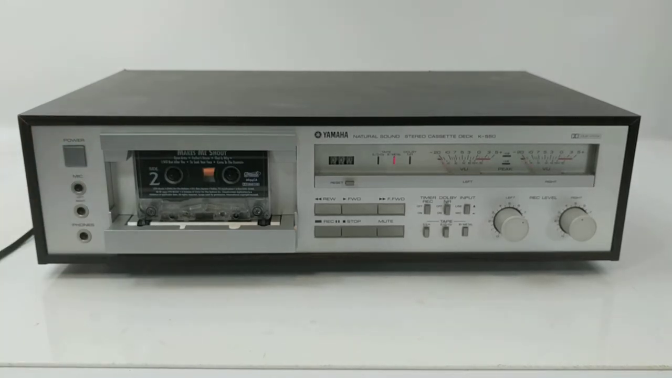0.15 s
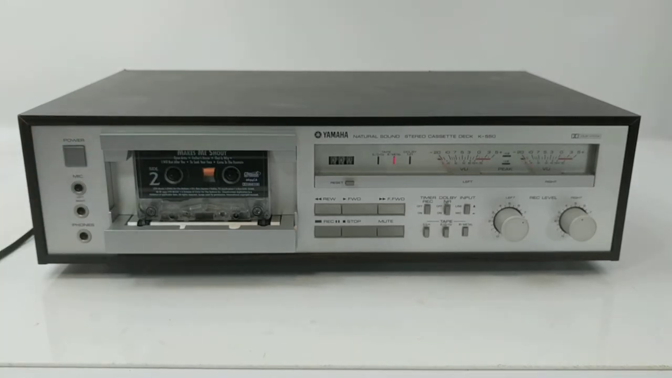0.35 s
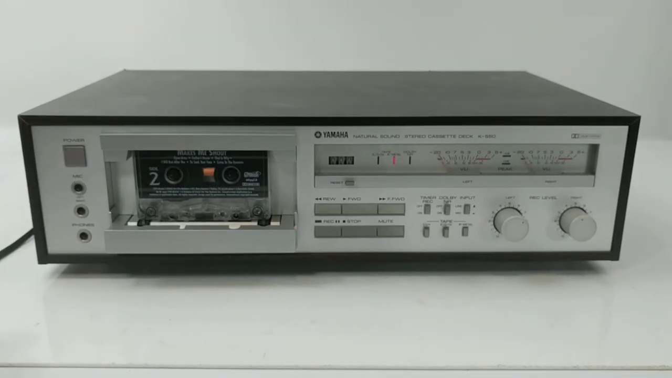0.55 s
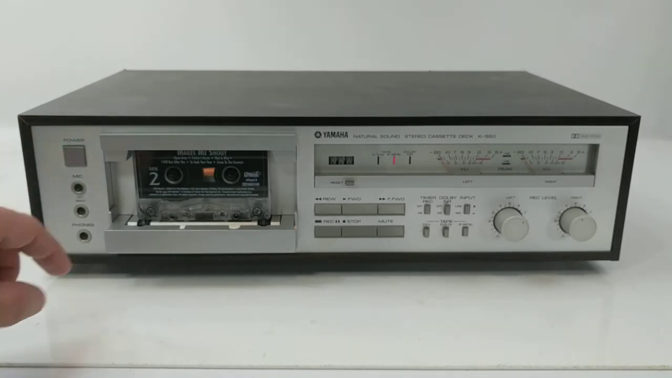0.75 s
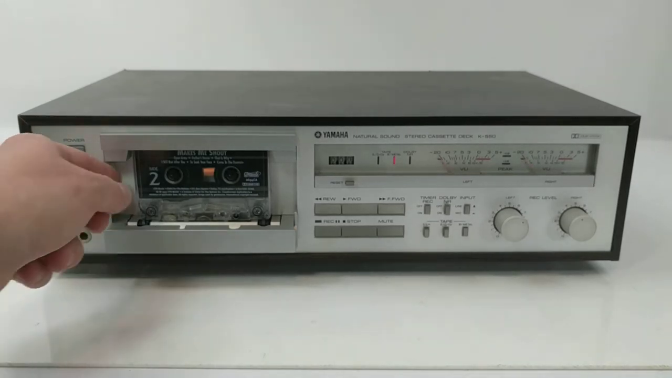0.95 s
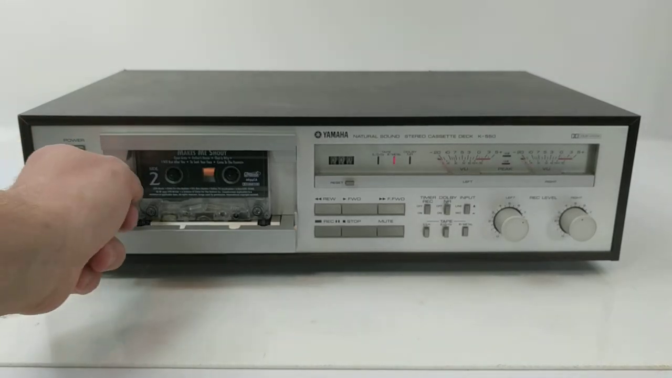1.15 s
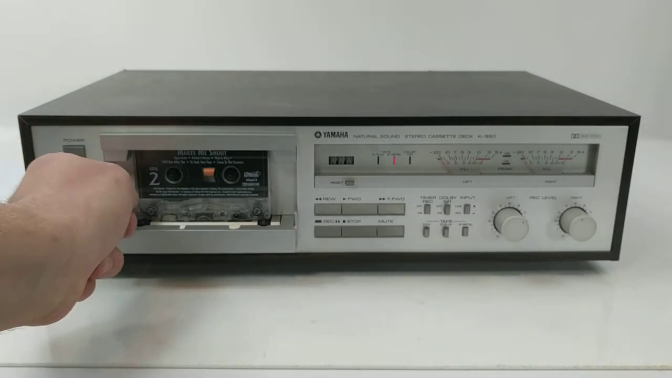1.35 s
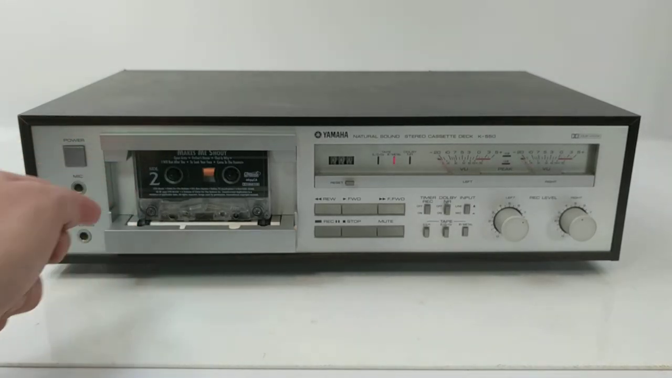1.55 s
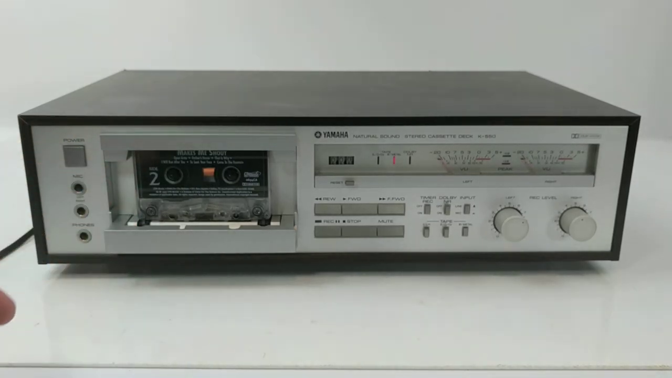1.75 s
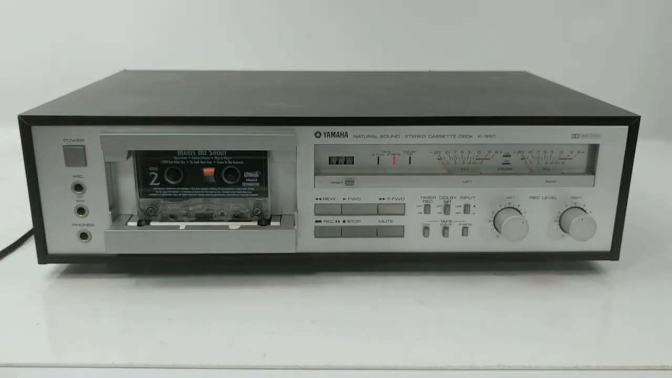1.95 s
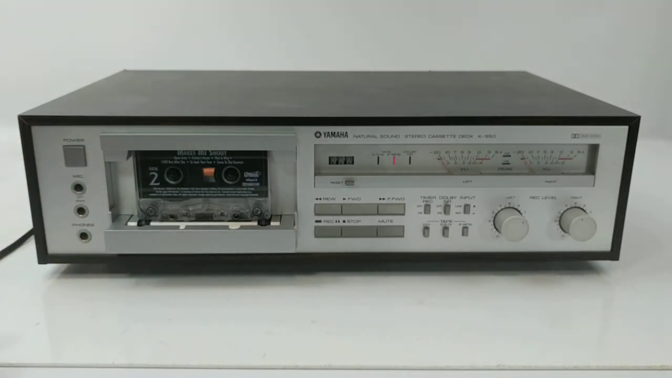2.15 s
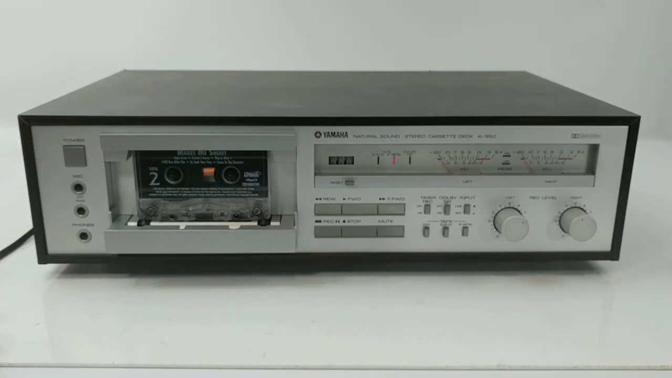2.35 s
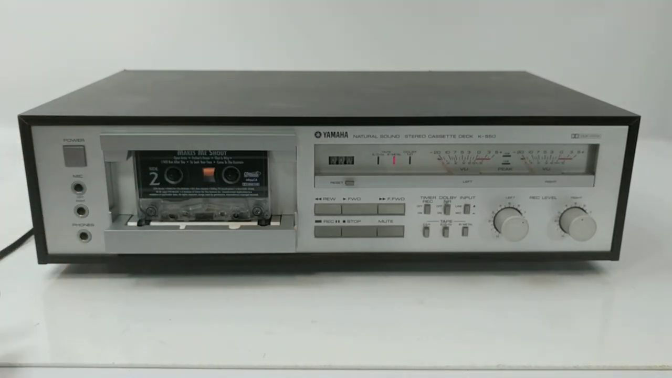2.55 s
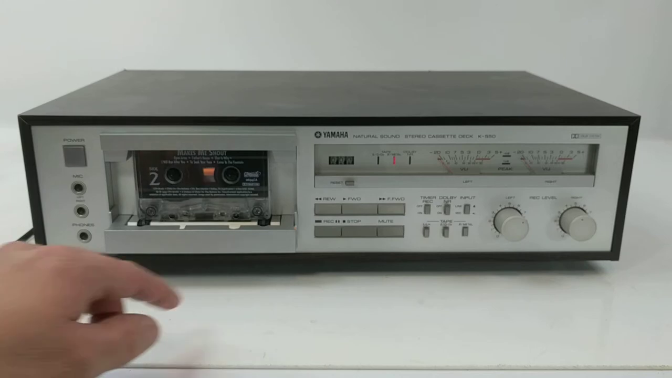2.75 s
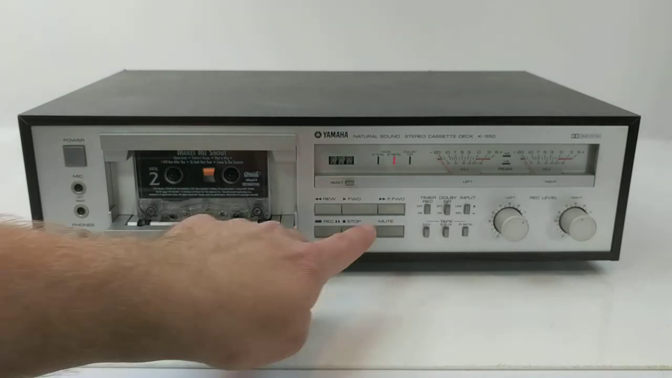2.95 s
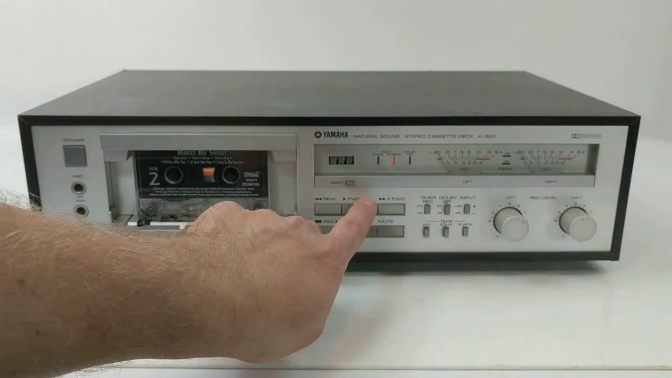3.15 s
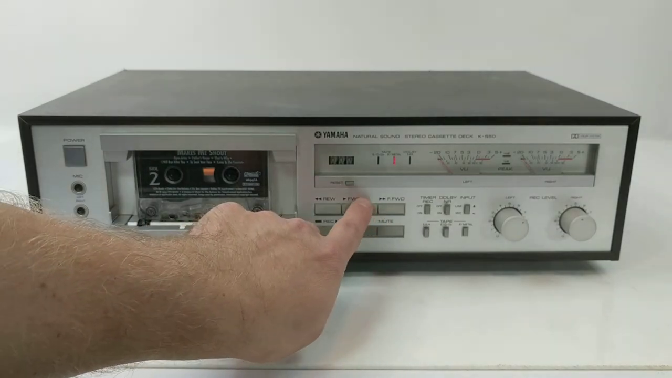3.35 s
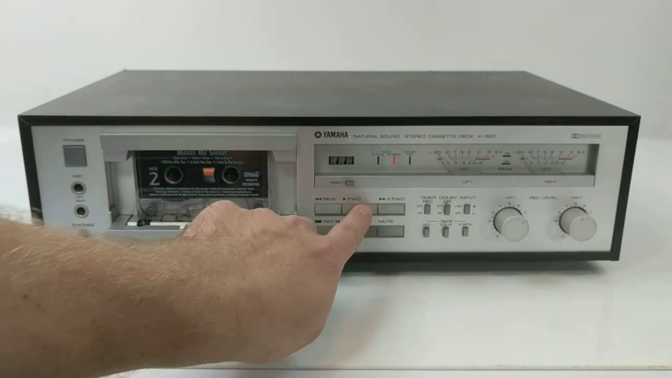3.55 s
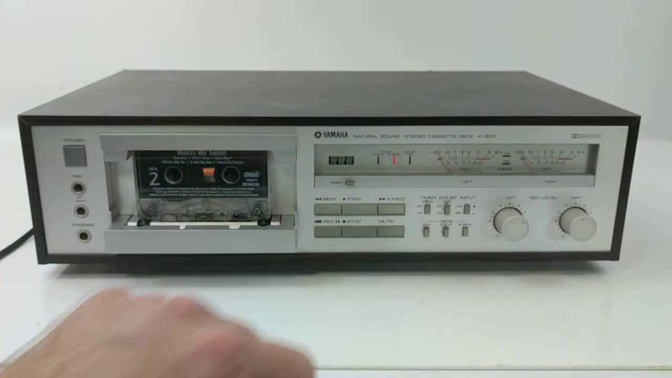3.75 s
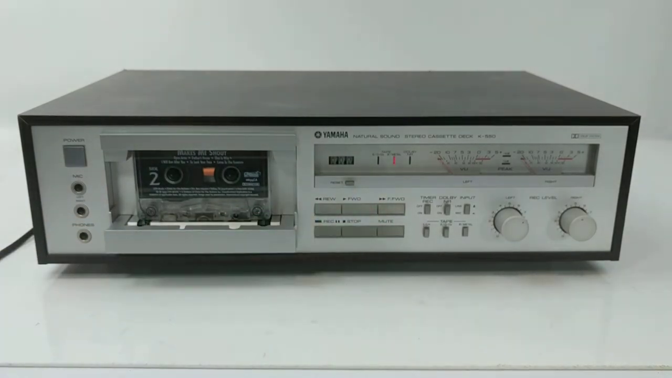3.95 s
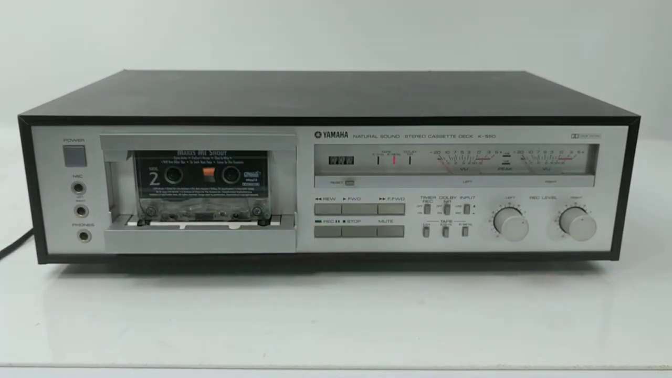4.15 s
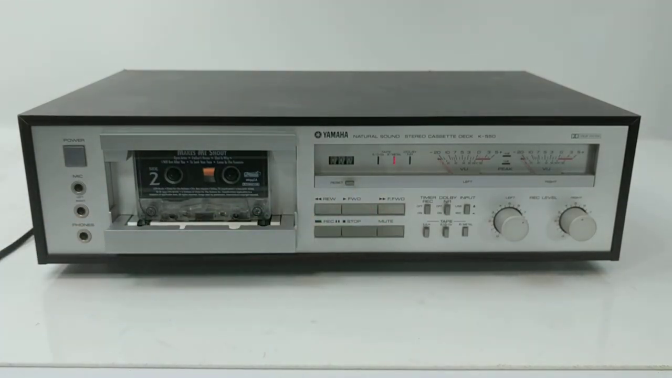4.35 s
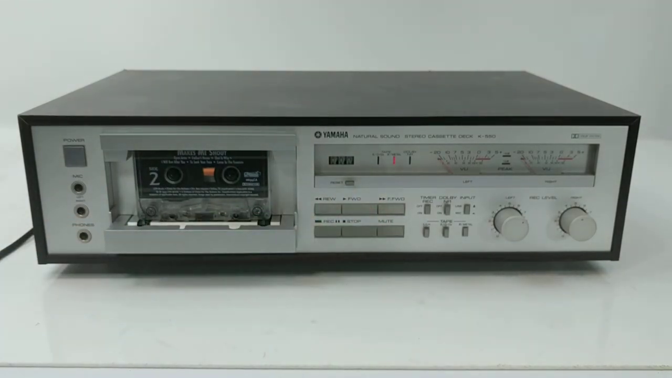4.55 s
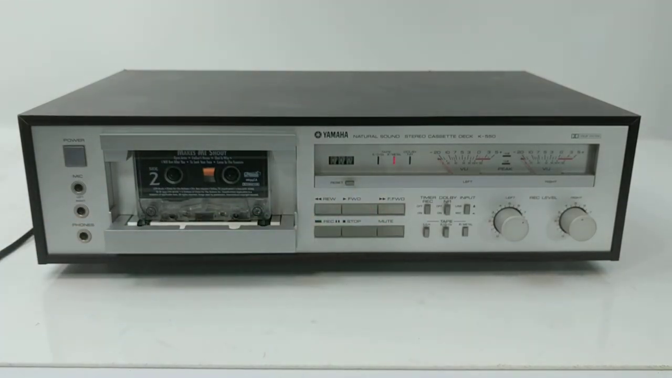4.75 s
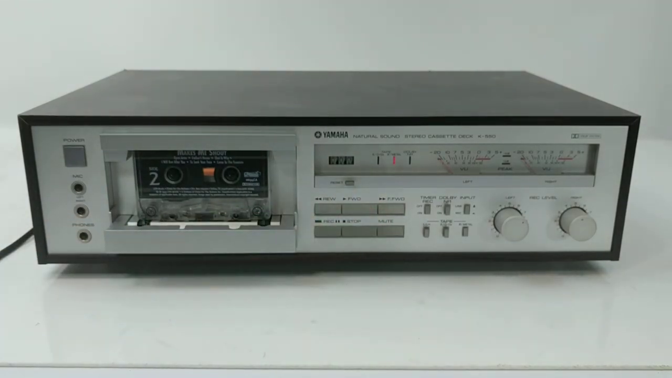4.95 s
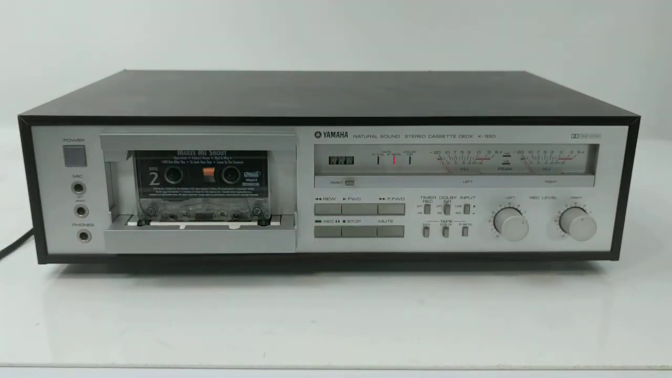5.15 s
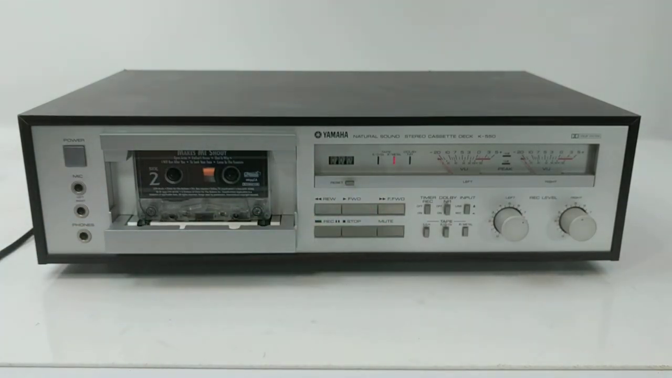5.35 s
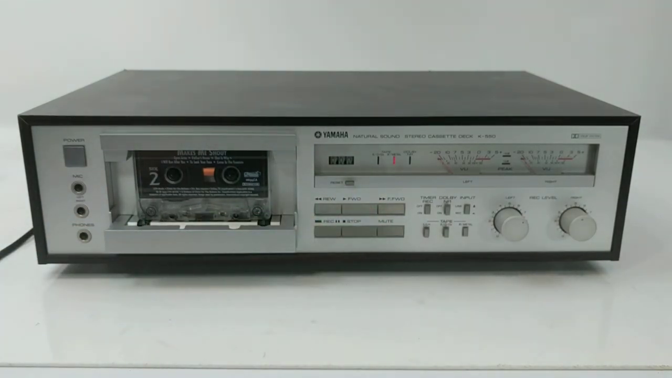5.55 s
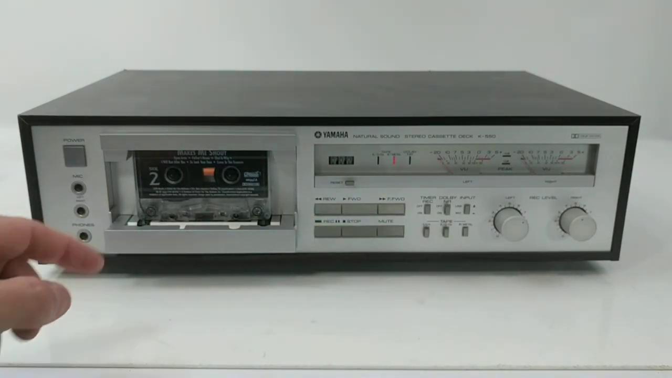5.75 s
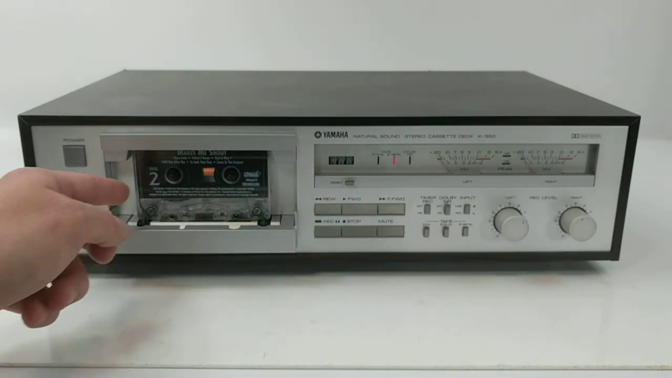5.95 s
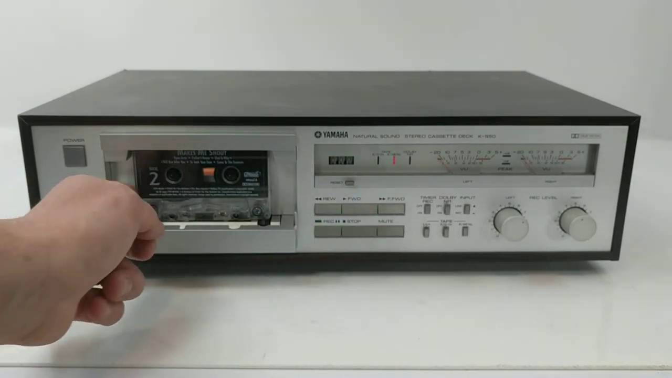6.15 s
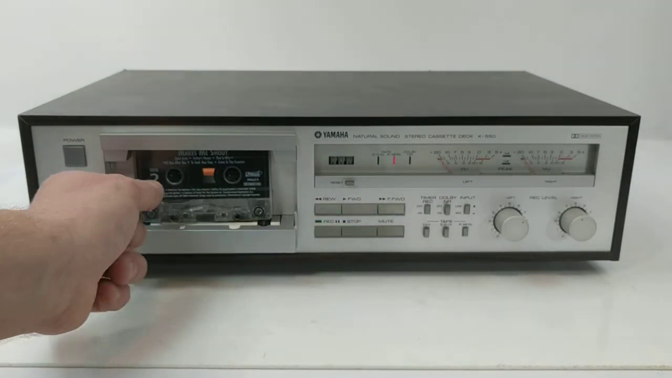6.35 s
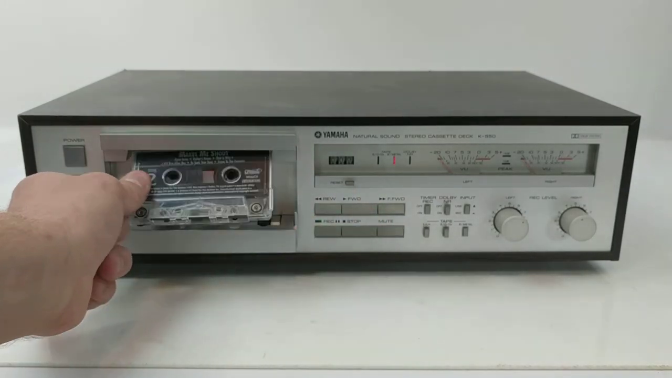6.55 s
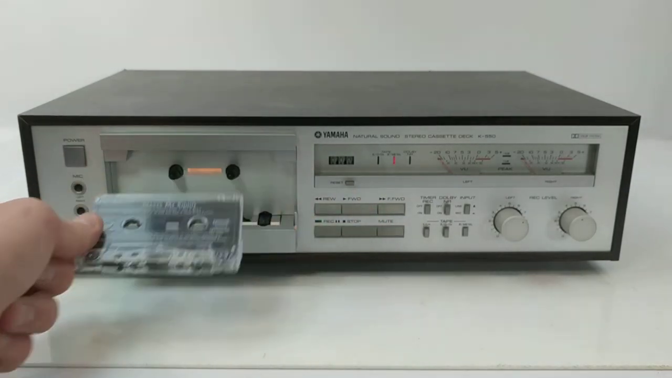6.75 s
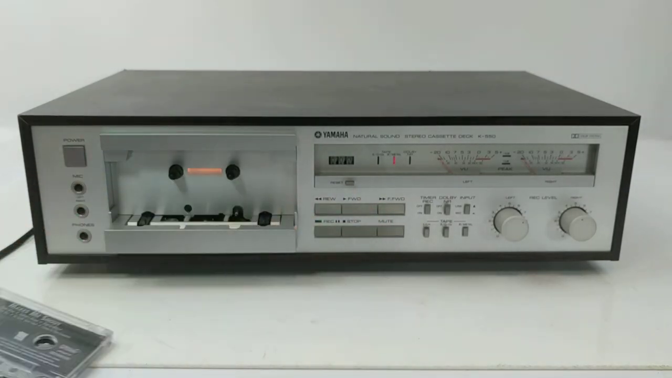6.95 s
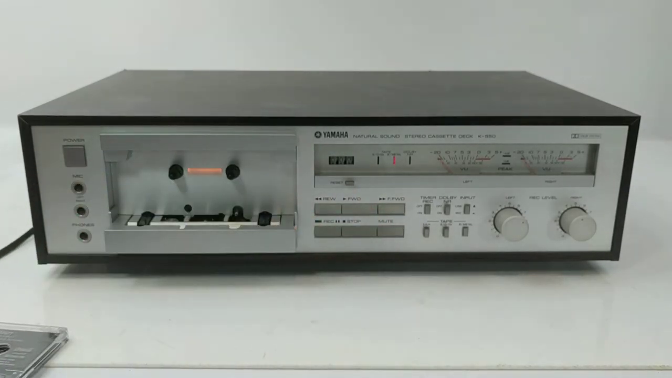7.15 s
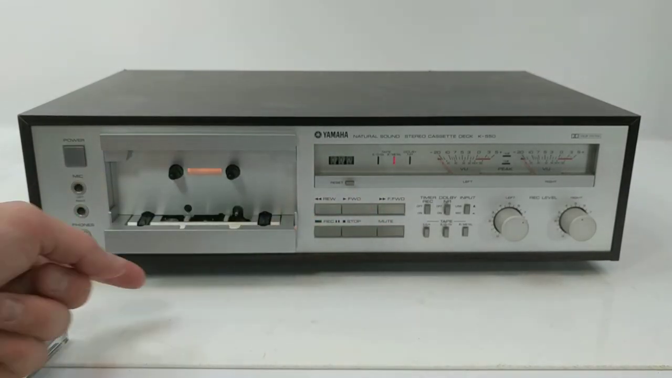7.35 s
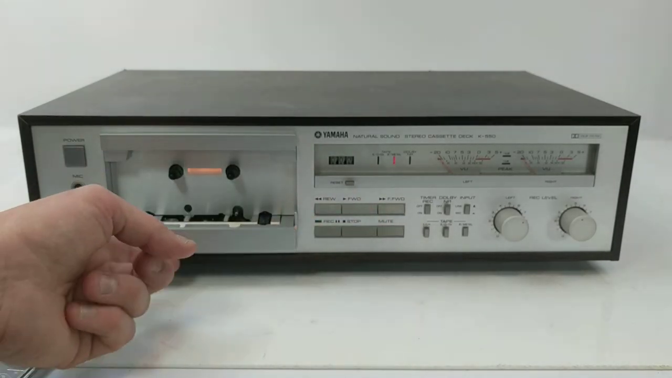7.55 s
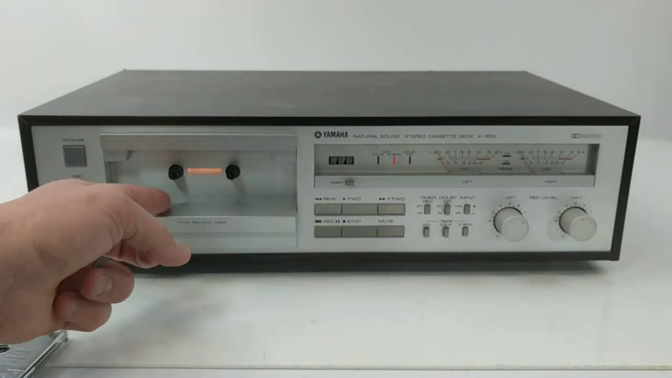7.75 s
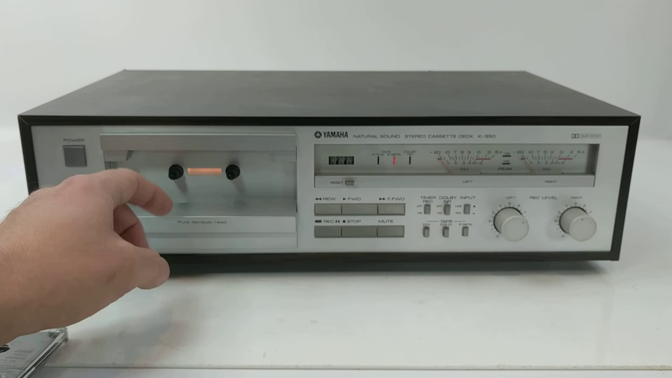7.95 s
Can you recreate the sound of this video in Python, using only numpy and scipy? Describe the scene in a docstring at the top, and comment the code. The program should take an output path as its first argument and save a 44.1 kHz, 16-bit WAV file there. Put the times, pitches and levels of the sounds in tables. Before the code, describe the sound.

Cassette deck hums softly, two pairs of solid mechanical clunks, then silence of the motor, sharp plastic clatter of a tape removed, a soft cover click.

```python
"""Cassette deck in a quiet room

A deck on a hard table, heard close, with the tail of the room some 20 dB lower. Multiples of the turn rate
make its capstan motor hum; twice the solenoid throws the head bridge in, faint gear ticks run, and it drops.
Then the motor stops, the cassette is pulled out of its well and put down on the table, and the head cover
is shut: each blow is a burst of chattering noise that rings the modes of what it strikes."""
import sys
import numpy as np
from scipy import signal
from scipy.fft import rfft, irfft
from scipy.io import wavfile
from scipy.ndimage import uniform_filter1d, map_coordinates

SR = 44100
rng = np.random.default_rng(int(sys.argv[2]) if len(sys.argv) > 2 else 0)


def output_pcm(signal):
    """Save a mono or channel-first signal as 16-bit PCM at the path in sys.argv[1].

    Samples are clipped to [-1, 1] before scaling.
    """
    pcm = np.clip(np.atleast_2d(signal).T, -1, 1) * 32767
    wavfile.write(sys.argv[1], SR, np.round(pcm).astype(np.int16))


N = 351918

# Edges of the five bands: thud, body, knock, clack, tick [Hz].
BAND_EDGES_HZ = [60, 300, 900, 2500, 7000, 19000]
# How long each band chatters on. One number per band: share of the t60 of the blow [ratio].
CHATTER_SHARE = [3.4, 2.03, 0.84, 0.69, 0.59]

# Colour of the room rumble. Each row: frequency in Hz, relative density in dB per Hz.
RUMBLE = [(15, -30.5), (25, -18), (75, -5), (156, -14.5), (364, -13.5), (1010, -23.5), (1160, -23.5),
          (1380, -24.5), (2500, -31.5), (3250, -53.5), (5500, -120)]
# Colour of the steady hiss. Each row: frequency in Hz, relative density in dB per Hz.
HISS = [(1470, -35), (2500, -5.5), (3240, 0.5), (6190, -9.5), (8140, -9), (9010, -13.5), (12000, -5.5),
        (12300, -8.5), (15100, -6), (16200, -20)]
# Thin steady whistles. Each row: frequency in Hz, width in Hz, rms level in dB.
WHISTLES = [(8123, 40, -98), (11630, 60, -88), (15100, 60, -97)]
RUMBLE_DB, HISS_DB = -68.5, -75.5   # rms
HISS_WAVER_DB = 0.7
BACKGROUND_CUTOFF_HZ, TOP_CUTOFF_HZ = 16200, 16900
ROOM_T60_S, ROOM_DB = 0.27, -20   # t60 before each band's share; tail against the direct sound

# Cycles of the transport. Each row: bridge thrown in seconds, dropped in seconds, latch resets in seconds.
CYCLES = [(.884, 1.508, 1.788), (3.499, 4.122, 4.395)]

# Strong lines of the motor hum. Each row: multiple of the turn rate, level in dB over HUM_DB running free,
# the same in dB with the pinch roller pressed on.
HUM_LINES = [(3, -5, -7), (4, -6.5, -8.5), (5, -13, -19), (6, 2.5, 2.5), (9, -4, 0), (10, -1.5, -1.5),
             (11, -6.5, -11), (12, -4, -5), (15, 5.5, 0), (17, -7.5, -16), (18, -15, -19), (20, -2, -1),
             (21, -7.5, -9), (22, -16, -16), (23, -8, -4.5), (25, -14, -15), (26, -20, -12.5),
             (27, -10.5, -11), (28, -5.5, -5), (29, -5.5, -7), (32, -35, -16), (34, -21, -12),
             (39, -16.5, -21), (43, -19, -23), (48, -17.5, -20)]
WEAK_DB, WEAK_DB_PER_MULTIPLE = -19, -0.2926   # all other multiples up to 52
TURN_HZ, FIRST_TURN = 37.44, 0.605   # turn rate; share of a turn done at the start
HUM_DB = -67   # reference for the lines
# Colour of the bearing noise. Each row: frequency in Hz, relative density in dB per Hz.
WHIRR = [(35, -36), (60, -24.5), (223, -5), (504, -6.5), (563, -3.5), (690, -6), (743, -7.5), (1180, -15),
         (5000, -25.5), (6500, -65), (11000, -120)]
WHIRR_DB, LOADED_WHIRR_DB = -73, 4.5   # rms running free; rise under load
PRESS_S, STOP_S, COAST_S = 0.045, 6.32, 0.1   # roller settles; power is cut; the motor dies 60 dB

# Take-up gear: starts after the throw, stops before the drop, time per tooth.
GEAR_LAG_S, GEAR_EARLY_S, TOOTH_S = 0.146, 0.03, 0.0297
GEAR_HZ, GEAR_DB = 10000, -66.5

# Thin pings and squeaks of springs and rubbing plastic.
# Each row: start in seconds, length in seconds, frequency in Hz, rms level in dB.
SQUEAKS = [(.958, 0.0083, 1300, -58), (1.008, 0.0054, 1480, -59.5), (.975, 0.049, 4760, -70),
           (.963, 0.075, 7050, -76), (6.367, .004, 1650, -39.5), (6.481, .004, 8800, -34.5),
           (6.547, 0.0117, 3560, -44), (6.574, 0.0035, 1600, -46), (6.666, .022, 7600, -56),
           (6.948, 0.029, 8700, -66), (7.035, 0.0078, 7600, -56.5), (7.765, .04, 5100, -78.5),
           (7.842, 0.018, 5070, -81)]
# A spring bounces six times after the first throw.
BOUNCE_FROM_S, BOUNCE_EVERY_S, BOUNCE_LENGTH_S, BOUNCE_HZ, BOUNCE_DB = 0.961, 0.0102, 0.003, 3610, -63

# Modes of the deck's chassis. Each row: frequency in Hz, level in dB over the bare crack, t60 in seconds.
CHASSIS = [(95, 6.5, 0.23), (167.3, 9, 0.24), (215.5, 10, 0.1), (378, 11.5, 0.14), (465, 6.5, 0.063),
           (653, 2, 0.048), (840, 3.5, 0.046), (1153, -5.5, 0.086), (1360, 2, 0.044), (1554, -0.5, 0.021),
           (1874, 0, .04), (2320, -5, 0.0088), (2710, 14, 0.052), (3300, 10.5, 0.03), (4350, 5.5, 0.0038),
           (5070, 4, 0.0044)]
# Modes of the cassette shell. Each row: frequency in Hz, level in dB over the bare crack, t60 in seconds.
SHELL = [(102, 4.4, 0.16), (217, 4.3, 0.063), (393.6, 12, .06), (655, 3.8, 0.036), (1055, 2.7, 0.17),
         (1268, 8.1, .035), (1480, 9.9, 0.018), (1677, 10, 0.019), (2660, 1.4, 0.075), (3560, 13, 0.038),
         (4017, 9.1, 0.0076), (4650, 3.8, 0.0054), (5170, 1.9, 0.0064)]
# Modes of the head cover. Each row: frequency in Hz, level in dB over the bare crack, t60 in seconds.
COVER_PANEL = [(100, 3.8, 0.17), (198, 6.6, 0.06), (400, 11.3, 0.028), (620, 1.4, 0.07), (1030, 4.8, 0.039),
               (1310, 3, 0.027), (1607, 3, 0.036), (2306, 5.9, 0.03), (3220, 6.9, 0.054),
               (4580, 4.9, 0.007)]

# Contacts of the transport, for the three moves below. Each row: seconds from the move, loudest level in dB
# of thud (60-300 Hz), body (300-900 Hz), knock (0.9-2.5 kHz), clack (2.5-7 kHz) and tick (over 7 kHz),
# chatter t60 in seconds before each band's share.
# The bridge thrown in, columns as above [s, dB x 5, s].
THROW = [(-.028, -68, -53.5, -49.5, -58, -68, 0.15), (-.003, -66.5, -56, -49, -51.5, -53.5, .027),
         (0, -38.5, -34, -25, -28, -35, .06), (0.0743, -66, -52.5, -53, -63, -62, .06)]
# The bridge dropping, columns as above [s, dB x 5, s].
DROP = [(-.031, -61, -66, -54.5, -50, -57, 0.095), (-.024, -50, -52, -48, -60, -56, 0.036),
        (0, -38.5, -46, -33, -34, -33, 0.074), (.0285, -39.5, -33, -32, -33, -31.5, .06),
        (.036, -32.5, -41.5, -38.5, -39.5, -49, 0.048)]
# The latch resetting, columns as above [s, dB x 5, s].
LATCH = [(-.0085, -61, -74, -49, -52, -60.5, 0.062), (0, -50, -51.5, -45.5, -46.5, -53, .042)]

# Blows by hand, for the three objects below. Each row: start in seconds, loudest level of the knock in dB,
# bass in dB over it, treble in dB over it, chatter t60 in seconds before each band's share.
# A key of the deck, columns as above [s, dB, dB, dB, s].
KEY = [(3.45, -44.5, -23.5, -11.5, .017)]
# The cassette pulled out and put down, columns as above [s, dB, dB, dB, s].
CASSETTE = [(6.317, -60, 0, 0.5, 0.068), (6.353, -54.5, -5, -5, .054), (6.362, -39.5, -20.5, -12, 0.061),
            (6.376, -35.5, -11.5, -6, 0.048), (6.463, -25.5, -21.5, -6, 0.052),
            (6.483, -23, -23.5, -8.5, 0.099), (6.491, -23.5, -21.5, -0.5, .066),
            (6.501, -35.5, -7.5, 1.5, 0.042), (6.536, -39, -12, -16, 0.038), (6.55, -42, -15, -0.5, 0.12),
            (6.568, -42, -17, -20, 0.057), (6.606, -48, -11, -3, .048), (6.614, -50.5, -8, -2.5, 0.11),
            (6.655, -37.5, -13.5, -6, .064), (6.667, -46.5, -6, 2, .052), (6.684, -28, -18.5, -4, 0.044),
            (6.727, -51, -6, 1, 0.049), (6.748, -59, -5, 4, .036), (6.778, -46.5, -18, -4.5, 0.0235),
            (6.818, -58, -5, -1.5, 0.043), (6.923, -32, -11, -10.5, 0.065), (6.956, -55.5, -7.5, 3.5, 0.14),
            (6.988, -35, -11, -8, 0.084), (7.009, -45, -12.5, -6, 0.14), (7.042, -58.5, -1, 10, 0.094),
            (7.074, -22, -18.5, -1, 0.085), (7.127, -27.5, -13.5, -4, 0.042), (7.145, -47, -2, 3.5, 0.09)]
# The head cover shut, columns as above [s, dB, dB, dB, s].
COVER = [(7.492, -57.5, -5, 6.5, .046), (7.497, -41, 2, 4, 0.032), (7.534, -37.5, -2, 1, 0.058),
         (7.585, -66, 5, 3, .055), (7.607, -50.5, -18, -2.5, 0.036), (7.648, -48.5, -9.5, -6, 0.11),
         (7.666, -44.5, -18, -17.5, 0.044), (7.678, -54.5, -0.5, -5.5, 0.087)]
THUD_UNDER_BODY_DB, TICK_UNDER_CLACK_DB = 5, 2
HITS_LOW_CUT_HZ = 66


def from_db(db):
    """Turns decibels into an amplitude ratio."""
    return 10 ** (np.asarray(db) / 20)


def rms_one(x):
    """Scales a sound to rms 1."""
    return x / np.sqrt(np.mean(x ** 2) + 1e-20)


def band(x, low_hz, high_hz):
    """Keeps the part of a sound between two frequencies."""
    return signal.sosfilt(signal.butter(3, [low_hz, high_hz], "band", fs=SR, output="sos"), x)


def coloured(spectrum):
    """Noise with the given dB per Hz, drawn straight over log frequency; rms 1."""
    hz = np.maximum(np.fft.rfftfreq(N, 1 / SR), 1)
    at_hz, level_db = np.transpose(spectrum)
    gain = from_db(np.interp(np.log(hz), np.log(at_hz), level_db))
    return rms_one(irfft(rfft(rng.standard_normal(N)) * gain, N))


def drift(knots_per_s):
    """Slow chance wander: a smooth curve through random knots of spread 1."""
    knots = rng.standard_normal(200)
    return map_coordinates(knots, [np.arange(N) / SR * knots_per_s], order=3)


def ring(force, hz, t60):
    """One mode: a unit click sets a dying sine of height 1 ringing."""
    radius = from_db(-60 / (max(t60, 0.005) * SR))
    angle = 2 * np.pi * hz / SR
    return signal.lfilter([0, np.sin(angle)], [1, -2 * radius * np.cos(angle), radius ** 2], force)


def background():
    """Room rumble, a hiss that wavers a little, and whistles: noise through very narrow resonances."""
    rumble = from_db(RUMBLE_DB) * coloured(RUMBLE)
    hiss = from_db(HISS_DB + HISS_WAVER_DB * drift(5.0)) * coloured(HISS)
    whistles = np.zeros(N)
    for hz, width_hz, db in WHISTLES:
        whistles += from_db(db) * rms_one(ring(rng.standard_normal(N), hz, 2.2 / width_hz))
    low_pass = signal.cheby2(16, 40, BACKGROUND_CUTOFF_HZ, fs=SR, output="sos")
    return signal.sosfilt(low_pass, rumble + hiss + whistles)


def room(x):
    """A short diffuse tail: bands of dying noise, the highest dying first."""
    t = np.arange(SR // 2) / SR
    tail = np.zeros(len(t))
    for low, high, share in zip(BAND_EDGES_HZ, BAND_EDGES_HZ[1:], (1.3, 1.8, 1.02, 1.08, 0.74)):
        tail += band(rng.standard_normal(len(t)), low, high) * from_db(-60 * t / (share * ROOM_T60_S))
    return signal.fftconvolve(x, tail / np.sqrt(np.sum(tail ** 2)))[:N]


def hum(column, turns):
    """Multiples of the turn rate: three pole kicks a turn, one knock a turn ringing high, the rest lagging."""
    strong_db = {round(row[0]): row[column] for row in HUM_LINES}
    total = np.zeros(N)
    for k in range(1, 53):
        lag = 0.3   # half cycles
        if k > 20:
            lag = -0.4
        elif k % 3 == 0:
            lag = 1
        level_db = strong_db.get(k, WEAK_DB + WEAK_DB_PER_MULTIPLE * k)
        total += from_db(level_db) * np.cos(np.pi * (2 * k * turns + lag))
    return total


def motor():
    """Hum over bearing noise; the pressed roller recolours the hum and raises the noise."""
    t = np.arange(N) / SR
    load = np.zeros(N)   # 0 running free, 1 roller pressed on
    for throw, drop, _ in CYCLES:
        load += np.clip(np.minimum(t - throw, drop + 2 * PRESS_S - t) / PRESS_S, 0, 1)
    turns = FIRST_TURN + np.cumsum(TURN_HZ * (1 + 0.0002 * drift(3.0))) / SR
    tone = (1 - load) * hum(column=1, turns=turns) + load * hum(column=2, turns=turns)
    tone = tone * from_db(HUM_DB + 0.53 * drift(3.87))
    whirr = from_db(WHIRR_DB + LOADED_WHIRR_DB * load) * coloured(WHIRR)
    running = from_db(np.clip(-60 * (t - STOP_S) / COAST_S, -100, 0))
    return running * (tone + whirr)


def gear():
    """A faint high ring for every tooth while the tape runs; every third is louder."""
    teeth = np.zeros(N)
    for throw, drop, _ in CYCLES:
        at_s = np.arange(throw + GEAR_LAG_S, drop - GEAR_EARLY_S, TOOTH_S)
        louder = np.arange(len(at_s)) % 3 == 2
        level_db = GEAR_DB + 4.5 * louder + 2.5 * rng.standard_normal(len(at_s))
        teeth[(at_s * SR).astype(int)] = from_db(level_db)
    return ring(teeth + 1e-18, GEAR_HZ, 0.0057)


def squeaks():
    """Quick uneven slips, a short swell of noise, ring one thin resonance."""
    out = np.zeros(N)
    bounces = [(BOUNCE_FROM_S + k * BOUNCE_EVERY_S, BOUNCE_LENGTH_S, BOUNCE_HZ, BOUNCE_DB + own_db)
               for k, own_db in enumerate(rng.normal(0, 1.8, 6))]
    for start_s, length_s, hz, db in SQUEAKS + bounces:
        count = round(length_s * SR)
        slips = rng.standard_normal(count) * np.hanning(count) ** 0.5
        slips = np.r_[slips, np.zeros(500)]   # time to ring out
        at = round(start_s * SR)
        out[at:at + len(slips)] += from_db(db) * rms_one(ring(slips, hz, 0.014))
    return out


def blows(events, modes, rise_s, rattle_db, rattle_s):
    """A dying chatter of tiny contacts cracks bare and rings the modes; a quieter rattle goes on, then settles."""
    out = np.zeros(N + SR)
    t = np.arange(SR // 5) / SR
    for start_s, *levels_db, t60 in events:
        own_db = rng.normal(0, 3, len(modes))   # no two blows land alike
        # contacts come in clumps of a millisecond or so
        clumps = np.repeat(rng.standard_normal(len(t) // 60), 60)
        contacts = np.exp(0.36 * rng.standard_normal(len(t)) + 0.33 * clumps)
        contacts *= 1 - np.exp(-t / rise_s)
        rattle = from_db(rattle_db) * np.exp(-(t / rattle_s) ** 2)
        at = round(start_s * SR)
        for low, high, level_db, share in zip(BAND_EDGES_HZ, BAND_EDGES_HZ[1:], levels_db, CHATTER_SHARE):
            decay = from_db(-60 * t / max(share * t60, 0.004))
            chatter = rng.standard_normal(len(t)) * contacts * (decay + rattle)
            part = band(chatter, low, high)
            for (hz, db, ring_s), strength_db in zip(modes, own_db):
                if low <= hz < high:
                    top_gain = 2 * np.log(1000) / (ring_s * SR)   # about gain 1 on top of the resonance
                    part = part + from_db(db + strength_db) * top_gain * ring(chatter, hz, ring_s)
            loudest = np.sqrt(uniform_filter1d(part ** 2, size=240).max())   # rms over some 5 ms
            out[at:at + len(t)] += from_db(level_db) * part / loudest
    return out[:N]


def transport():
    """Bridge and latch: every cycle plays the same contacts at its own times."""
    events = []
    for moves in CYCLES:
        for move_s, contacts in zip(moves, (THROW, DROP, LATCH)):
            events += [(move_s + offset_s, *rest) for offset_s, *rest in contacts]
    return events


def by_hand(rows):
    """Spreads level, bass and treble of each blow over the five bands."""
    events = []
    for start_s, knock_db, bass_db, treble_db, t60 in rows:
        body_db, clack_db = knock_db + bass_db, knock_db + treble_db
        thud_db, tick_db = body_db - THUD_UNDER_BODY_DB, clack_db - TICK_UNDER_CLACK_DB
        events.append((start_s, thud_db, body_db, knock_db, clack_db, tick_db, t60))
    return events


def scene():
    """Blows and squeaks with their room tail, over motor, gear and background."""
    deck = blows(transport() + by_hand(KEY), CHASSIS, rise_s=0.001, rattle_db=-25.0, rattle_s=0.04)
    cassette = blows(by_hand(CASSETTE), SHELL, rise_s=0.0011, rattle_db=-25.5, rattle_s=0.033)
    cover = blows(by_hand(COVER), COVER_PANEL, rise_s=0.00037, rattle_db=-20.5, rattle_s=0.036)
    hits = deck + cassette + cover + squeaks()
    # the blows carry no deep bass
    hits = signal.sosfilt(signal.butter(3, HITS_LOW_CUT_HZ, "high", fs=SR, output="sos"), hits)
    return (hits + from_db(ROOM_DB) * room(hits) + motor() + gear() + background())[None]


def record(dry):
    """The top of the spectrum is cut by a steep low-pass."""
    return signal.sosfilt(signal.cheby2(12, 70, TOP_CUTOFF_HZ, fs=SR, output="sos"), dry)


dry = scene()
out = record(dry)
output_pcm(out)
```